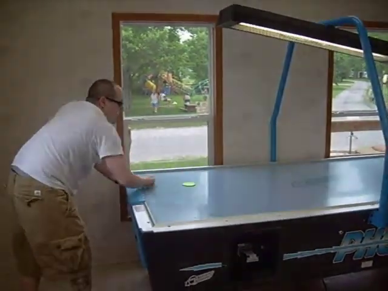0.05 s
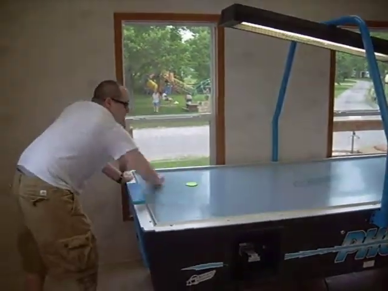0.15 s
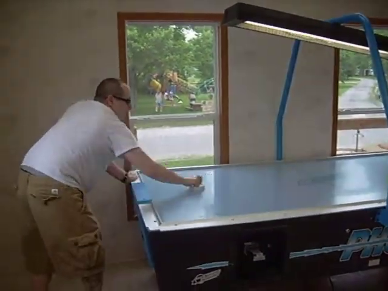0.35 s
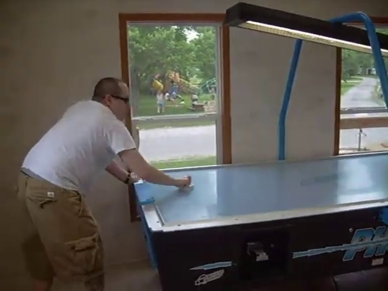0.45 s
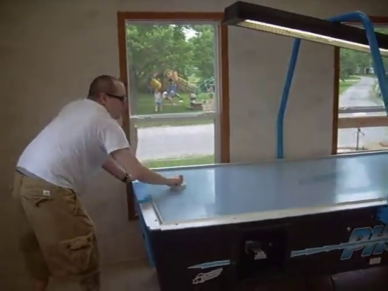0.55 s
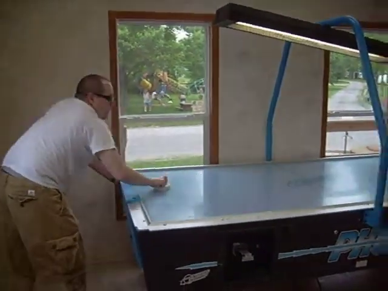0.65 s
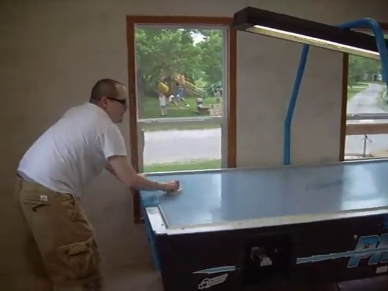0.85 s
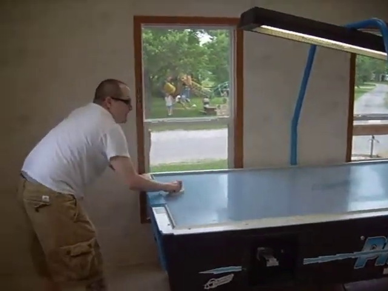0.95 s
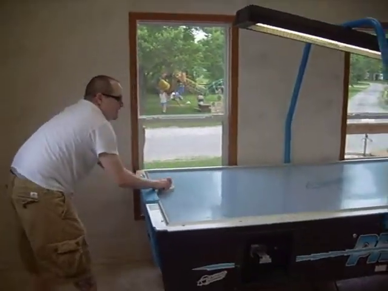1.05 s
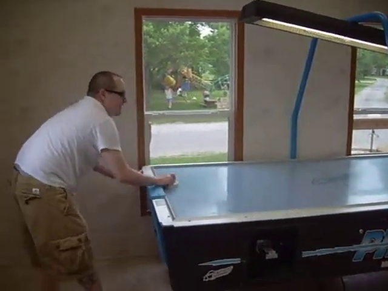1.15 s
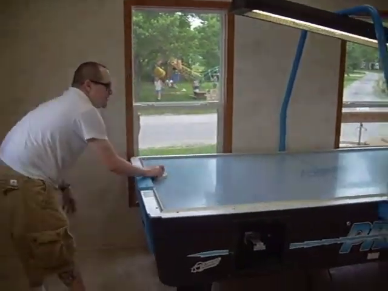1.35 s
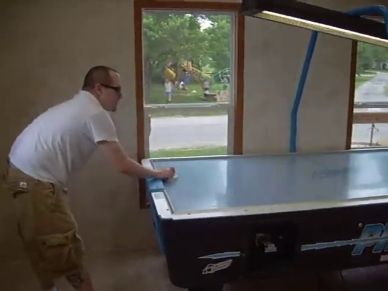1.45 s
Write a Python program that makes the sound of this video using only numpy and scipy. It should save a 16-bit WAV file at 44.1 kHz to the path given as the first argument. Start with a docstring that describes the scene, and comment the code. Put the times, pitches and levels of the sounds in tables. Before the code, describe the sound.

An air hockey puck is struck with a bright mallet click, then clacks loudly off the rails and rebounds more softly, echoing in a bare room over faint blower hiss, on a small overloading camera microphone.

```python
"""A hard air-hockey puck, driven by a mallet, cracks against the rails and rebounds more softly.
Each contact is a decaying noise crack plus an echoing tail, both coloured by the parts that ring.
Under the game the table's blower hisses as coloured noise and its motor hums as two sines.
The room is bare and echoing; a small camera's microphone overloads on the strongest peaks.
A few thin ticks, some with a low pop, lie dry in the camera's sound."""
import sys
import numpy as np
from scipy import signal
from scipy.fft import rfft, irfft, next_fast_len
from scipy.io import wavfile

SR = 44100
rng = np.random.default_rng(int(sys.argv[2]) if len(sys.argv) > 2 else 0)


def master(y):
    """Save y as 16-bit WAV."""
    cut = np.clip(np.atleast_2d(y).T, -1, 1)
    pcm = np.round(cut * 32767)  # scale
    wavfile.write(sys.argv[1], SR, pcm.astype(np.int16))


N = 66150  # 1.5 s

# What rings at a contact, one table for each kind of contact:
# (centre [Hz], width [Hz], peak over the plain knock [dB])
MALLET = [(785, 220, 4.5), (3330, 150, 14.5), (3850, 520, 21.5), (7520, 310, 20.5)]
PUCK = [(2300, 870, 2.1), (3180, 650, 5.2), (3590, 610, 9.6), (7560, 230, 22.3)]
RAIL = [(374, 210, 3.9), (897, 13.3, 11.2), (1982, 132, 9.05), (3336, 305, 7.1), (3737, 340, 11.3),
        (4188, 157, 19.9), (5530, 960, 10.2)]
# a soft rebound (centre [Hz], width [Hz], peak over the plain knock [dB])
GLANCE = [(3240, 570, 0.19)]
# the table's hollow body (centre [Hz], width [Hz], peak over the plain knock [dB])
THUMP = [(589, 133, 25.8), (819, 140, 25)]
# a light, bright touch (centre [Hz], width [Hz], peak over the plain knock [dB])
TAP = [(3200, 280, 1), (4130, 600, 10), (8900, 4000, 13.5)]


def amp(db):
    """Decibels to gain."""
    return 10 ** (np.asarray(db) / 20)


def unit(x):
    """Scale to rms 1."""
    return x / np.sqrt(np.mean(x ** 2) + 1e-20)


def along(points, hz):
    """Read (Hz, value) points at hz, interpolating on a log frequency axis."""
    f, v = np.transpose(points)
    return np.interp(np.log(hz + 1), np.log(f + 1), v)


def coloured(x, gain):
    """Filter x causally, with minimum phase, so that the magnitude response is gain(hz)."""
    m = 2 * next_fast_len(N)
    magnitude = np.maximum(gain(np.fft.rfftfreq(m, 1 / SR)), 1e-6)
    cepstrum = irfft(np.log(magnitude), m)
    # fold the negative-time half onto the positive one: nothing sounds before the blow
    cepstrum[1:m // 2] *= 2
    cepstrum[m // 2 + 1:] = 0
    response = np.exp(rfft(cepstrum))
    return irfft(rfft(x, m) * response, m)[:N]


def puck():
    """Each contact is a short crack and its echo, both coloured by what was struck."""
    # the contacts in order of time: (time [s], level [dB], first crack over the echo [dB],
    # crack t60 [s], tilt [dB per octave], what rings [one of the tables above])
    hits = [ (0.137, -26.5, 4.5, 0.11, -4, TAP), (0.184, -29, 10, 0.035, 5, GLANCE),
            (0.188, -27, 11, 0.017, 2.5, GLANCE), (0.227, -14.5, 8.5, 0.047, 0, MALLET),
            (0.243, -25.5, 14, 0.12, 3, THUMP), (0.266, -19.5, 8, 0.023, -0.5, MALLET),
            (0.367, -12.5, 8.5, 0.053, 2.5, PUCK), (0.515, -8, 4.5, 0.053, 1.5, RAIL),
            (0.570, -12, -1, 0.021, 2, RAIL), (0.632, -12, 0.5, .2, 1.5, RAIL),
            (0.928, -15.5, 4.5, 0.13, 0, GLANCE), (1.057, -21.5, 4.5, 0.069, -0.5, GLANCE),
            (1.145, -29, 6.5, 0.035, -1.5, GLANCE), (1.170, -21, 6, 0.14, 0.5, GLANCE),
            (1.296, -42.5, 13, .04, 0, GLANCE), ]
    out = np.zeros(N)
    t = np.arange(N) / SR
    for time_s, level_db, crack_db, crack_t60, tilt_db, modes in hits:
        decay = np.exp(-np.log(1000) * t / crack_t60)  # down 60 dB after one t60
        crack = amp(crack_db) * decay * rng.standard_normal(N)
        blow = coloured(crack + echo(), lambda hz: body(hz, tilt_db, modes))
        start = round(time_s * SR)
        out[start:] += amp(level_db) * blow[:N - start]
    return out


def body(hz, tilt_db, modes):
    """Gain of one contact: the plain knock with the struck part's resonances on top."""
    # the plain knock of puck on table: (frequency [Hz], relative level [dB])
    knock_points = [(40, -30), (150, -33.5), (370, -14.5), (600, -15), (900, -6.5), (1500, -0.5),
                    (2000, 0.5), (2500, -2.5), (3150, 2.5), (3700, -9), (4500, -16.5), (5600, -31),
                    (8000, -40.5), (11000, -41), (13000, -60)]
    knock = unit(amp(along(knock_points, hz)))
    peaks = 0
    for centre, width, peak_db in modes:
        detuning = (hz - centre) / width
        peaks = peaks + amp(peak_db) ** 2 / (1 + detuning ** 2 * 2) ** 2  # power
    octaves = np.log2(np.clip(hz, 200, 6000) / 2000)
    return knock * np.sqrt(1 + peaks) * amp(tilt_db * octaves)


def echo():
    """A fresh room tail: it arrives late, builds up, then each frequency dies at its own speed."""
    # how long the bare room rings: (frequency [Hz], t60 [s])
    room = [(150, 0.3), (500, 1), (1500, 0.98), (3200, 0.83), (4500, 0.7), (9000, 1)]
    delay_s, rise_s = 0.0063, 0.0055
    hz, frame_s, spectrum = signal.stft(rng.standard_normal(N), SR, nperseg=256)
    fade = amp(-60 * frame_s / along(room, hz)[:, None])
    tail = signal.istft(spectrum * fade, SR, nperseg=256)[1][:N]
    age = np.maximum(np.arange(N) / SR - delay_s, 0)
    return tail * (1 - np.exp(-age / rise_s))


def blower():
    """Air hissing through the table top is coloured noise; the motor's hum is steady sines."""
    # colour of the air: (frequency [Hz], relative level [dB])
    air_points = [(53, -73), (90, -25), (108, -13.5), (283, -12.5), (319, -9.5), (346, -9), (441, -11.5),
                  (478, -12.5), (2160, -12.5), (3160, -5.5), (11000, -62.5), (14300, -96), (22000, -120)]
    # motor lines: (frequency [Hz], rms level [dB])
    hum_lines = [(58.5, -56), (118, -67)]
    air_db = -44  # rms level
    t = np.arange(N) / SR
    air = unit(coloured(rng.standard_normal(N), lambda hz: amp(along(air_points, hz))))
    hum = np.zeros(N)
    for hz, level_db in hum_lines:
        phase = rng.random()  # in cycles
        hum += amp(level_db) * np.sqrt(2) * np.sin(2 * np.pi * (hz * t + phase))
    return amp(air_db) * air + hum


def ticks():
    """Dry, very short ticks with no echo, some with a low pop: single-sample impulses, filtered."""
    # ticks in the camera's sound: (time [s], tick [dB], low pop under it [dB])
    moments = [(0.202, -17.5, -30), (0.303, -6, 7), (0.504, -13, 5), (0.569, 1, -7), (0.7363, -6.5, -30),
               (0.769, -9.5, 5), (0.803, -3, -11), (0.970, -16.5, -13), (1.003, -22, -32),
               (1.0363, -13.5, 4.5), (1.269, -15, -27), (1.303, -18, -26), (1.3365, -28, -35)]
    # colour of a tick: (frequency [Hz], gain [dB])
    tick_points = [(100, -17), (2000, 10), (6000, 6.5), (10500, 4.5), (12000, -2.5), (13200, -31.5)]
    # colour of a pop: (frequency [Hz], gain [dB])
    pop_points = [(30, 1), (300, -1), (1000, 5.5), (3000, -20), (9000, -58.5)]
    spikes, pops = np.zeros((2, N))
    for time_s, tick_db, pop_db in moments:
        at = round(time_s * SR)
        spikes[at] = amp(tick_db)
        pops[at] = amp(pop_db)
    thin = coloured(spikes, lambda hz: amp(along(tick_points, hz)))
    low = coloured(pops, lambda hz: amp(along(pop_points, hz)))
    return thin + low


def scene():
    """The game and the blower together in the room, in mono."""
    return (puck() + blower())[None]


def record(dry):
    """The camera clips unevenly, ticks, dulls the treble and keeps nothing above its band limit."""
    # treble response of the camera: (frequency [Hz], gain [dB])
    treble = [(5000, -1.5), (10200, -4.5), (11200, -9), (12200, -13.5), (15500, -14)]
    band_limit_hz = 15900
    ceiling, hardness = 0.72, 24  # clipping amplitude before the offset is removed; knee sharpness
    offset = 0.016  # makes one side clip first
    driven = dry + offset
    clipped = driven / (1 + np.abs(driven / ceiling) ** hardness) ** (1 / hardness) - offset
    m = 2 * next_fast_len(N)
    hz = np.fft.rfftfreq(m, 1 / SR)
    response = amp(along(treble, hz)) * (hz < band_limit_hz)
    return irfft(rfft(clipped + ticks(), m) * response, m)[:, :N]


dry = scene()
out = record(dry)
master(out)
```